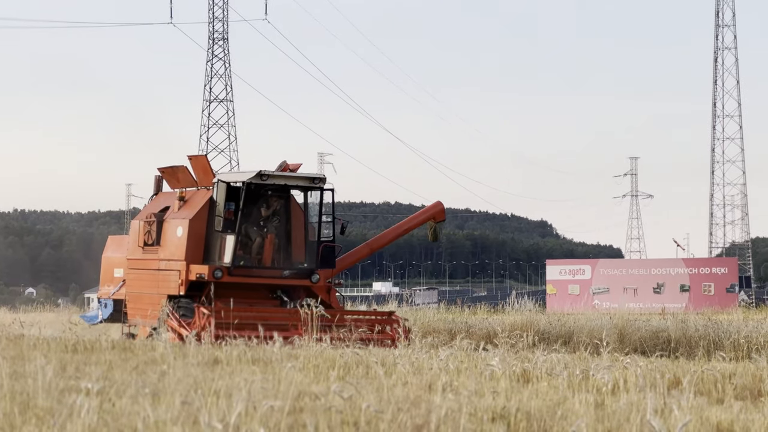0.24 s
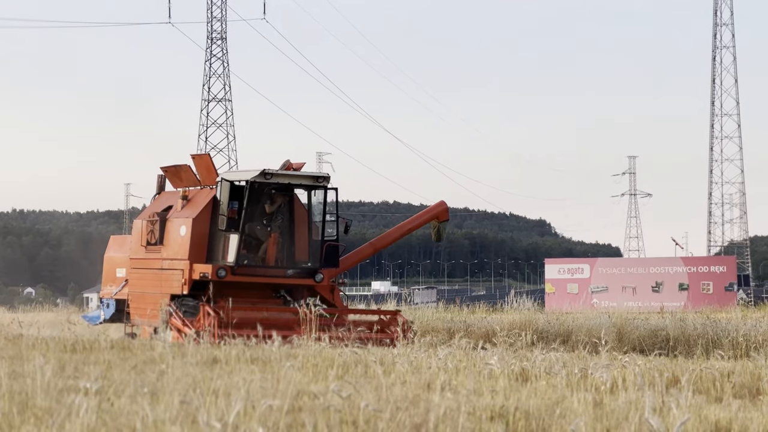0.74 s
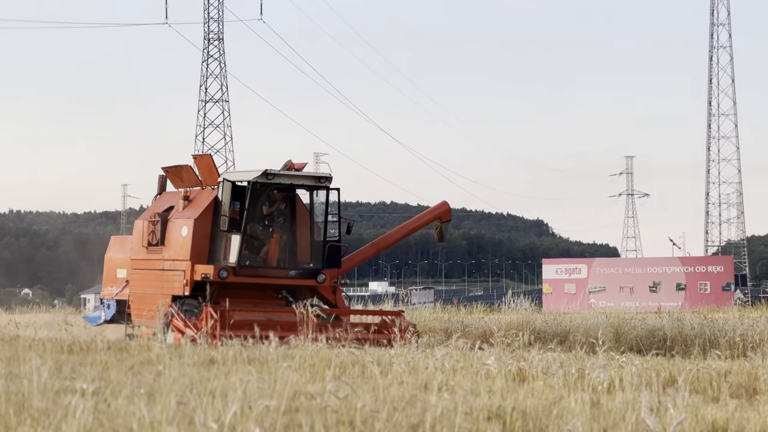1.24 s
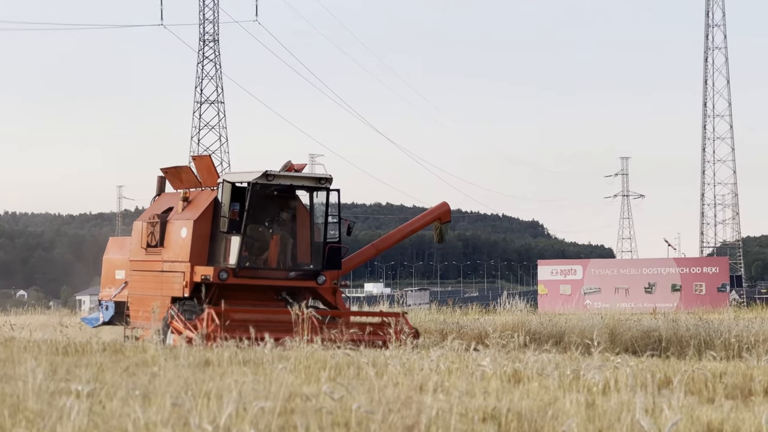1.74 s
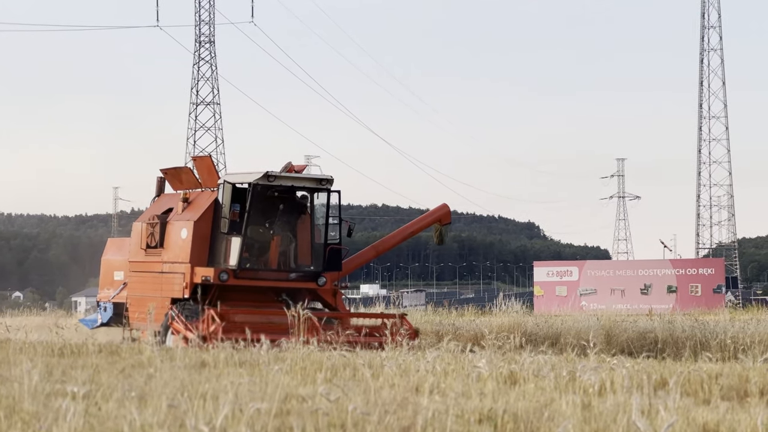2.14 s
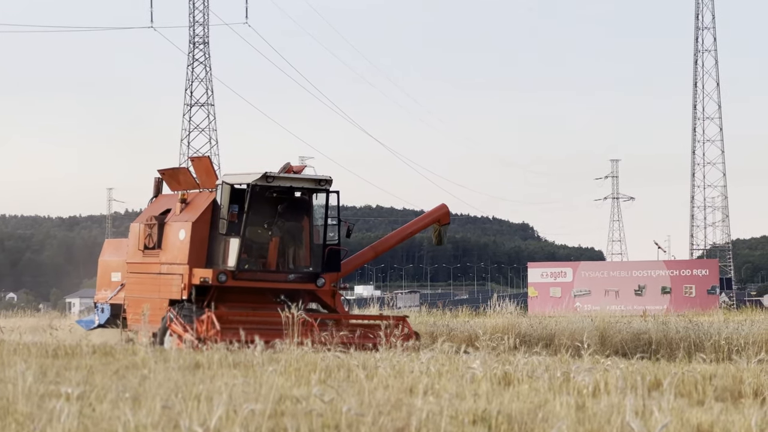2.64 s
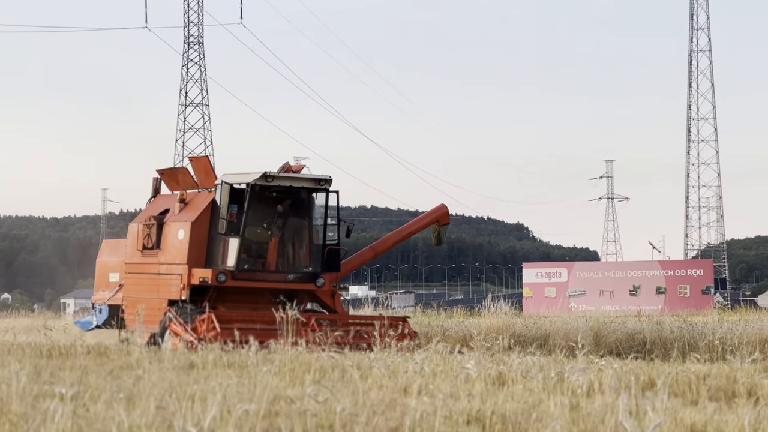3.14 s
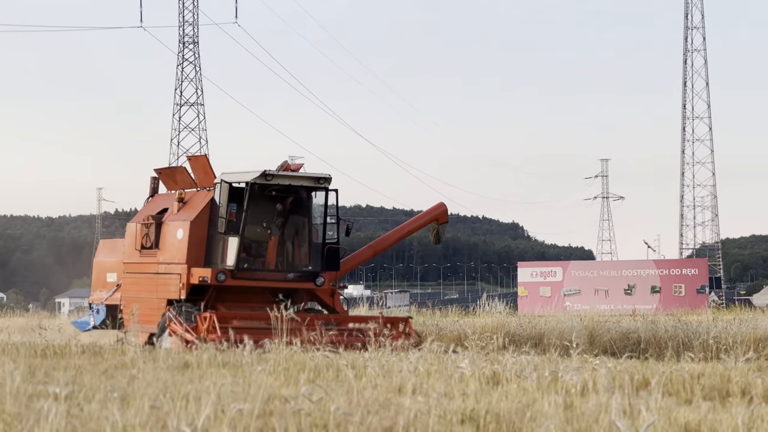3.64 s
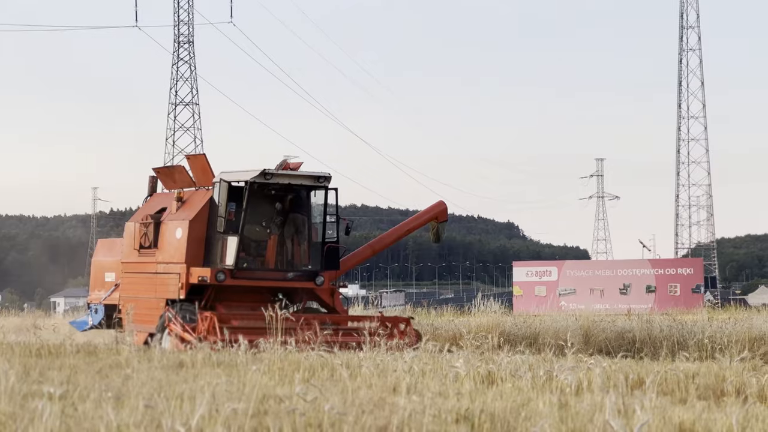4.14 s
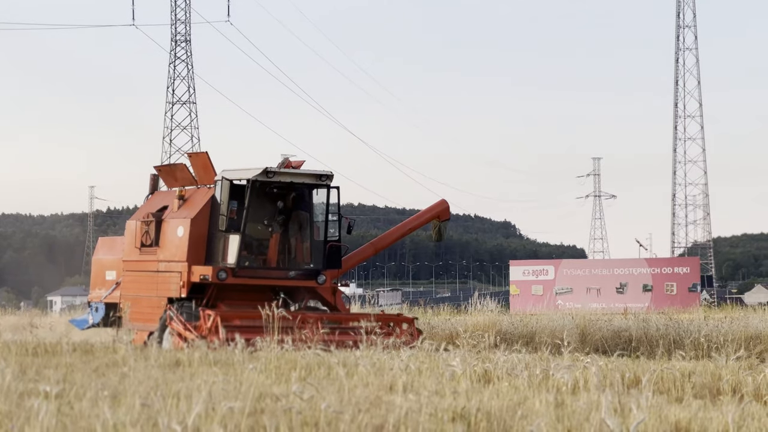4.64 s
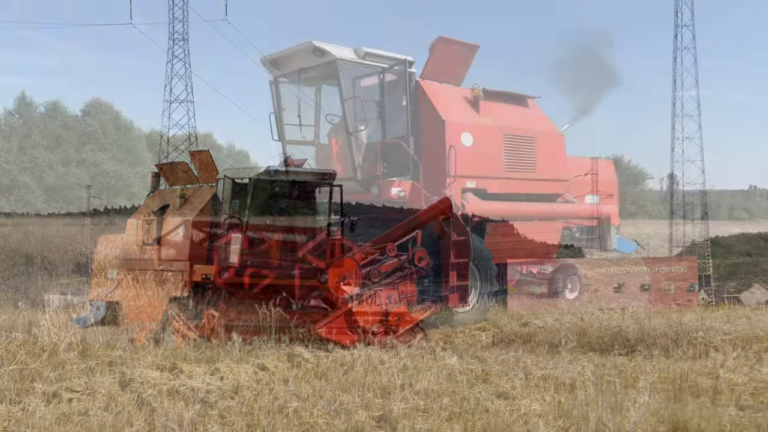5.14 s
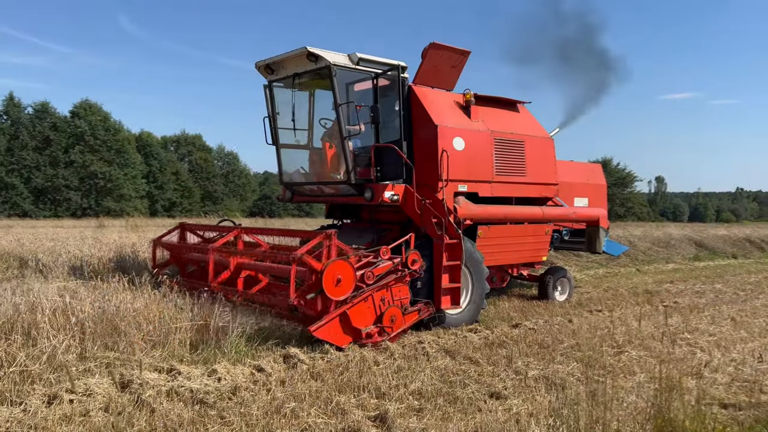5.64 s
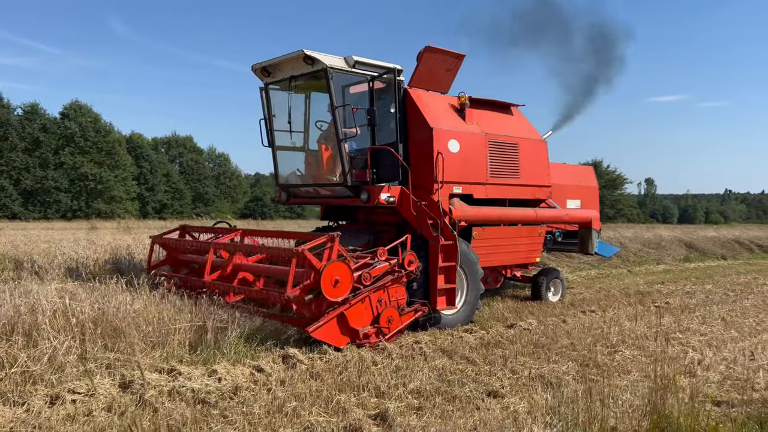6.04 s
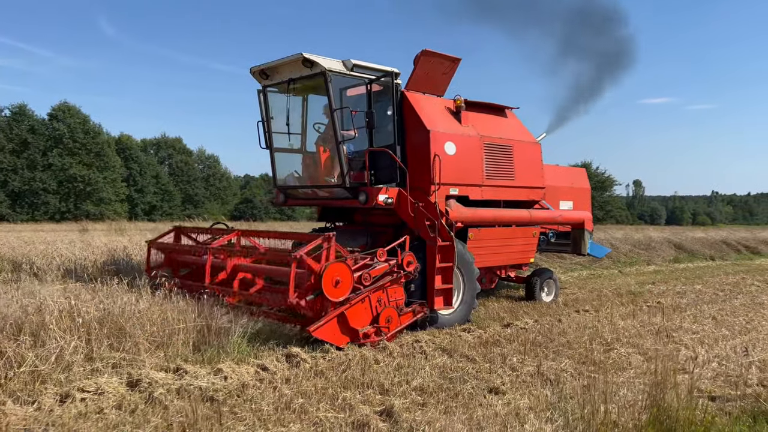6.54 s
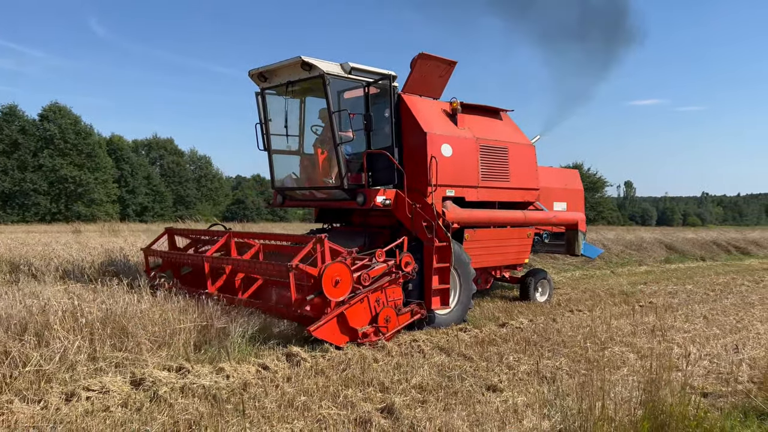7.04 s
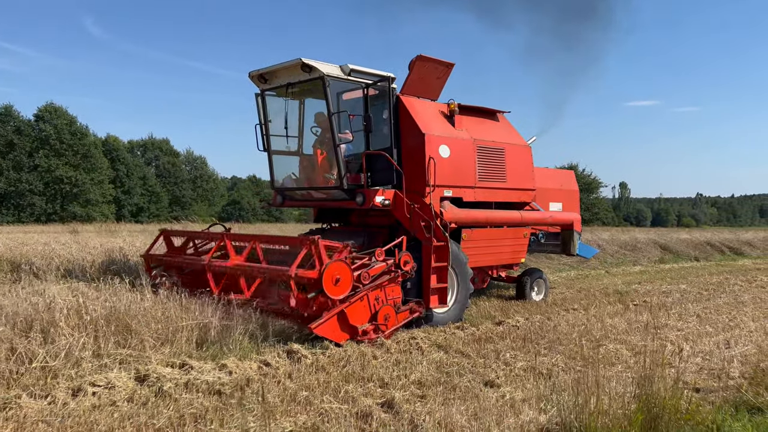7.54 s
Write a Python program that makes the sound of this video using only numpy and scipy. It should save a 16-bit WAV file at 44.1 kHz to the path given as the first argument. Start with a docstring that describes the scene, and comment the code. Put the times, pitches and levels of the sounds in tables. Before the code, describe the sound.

A heavy diesel harvesting machine heard from three distances in a dry open field. First a distant, dull, near-constant hum and rumble; then a smooth blend into a nearer, slightly harsher drone with dull knocks; then a sudden cut to a close microphone, where the motor starts low and strained, climbs in pitch and throbs, surrounded by dense metallic rattle, sharp knocks and crackling swishes of straw. It ends still running.

```python
"""The diesel of a combine harvester at work, heard from three places in turn: far off, blending into
a nearer place, then cut to close by while the engine picks up speed.
Firing orders are smeared harmonic tones; the drone of drum, fan and sheet metal and the hiss of straw
are coloured, partly coherent two-channel noise; jolts, knocks and chinks are decaying modes.
Passing wads of straw lift the noise in short swishes."""
import sys
import numpy as np
from scipy import signal
from scipy.io import wavfile
from scipy.ndimage import uniform_filter1d

SR = 44100
rng = np.random.default_rng(int(sys.argv[2]) if len(sys.argv) > 2 else 0)


def unload_wav(signal):
    """Save mono or channel-first audio to the path in sys.argv[1] as 16-bit WAV at rate SR, clipped to [-1, 1]."""
    wavfile.write(
        sys.argv[1],
        SR,
        np.round(np.clip(np.atleast_2d(signal).T, -1, 1) * 32767).astype(np.int16),
    )


N = 343980

BLEND_START_S, CUT_S, END_S = 4.78, 5.857, 7.8
FAR_HZ, FULL_HZ = 63.3, 66  # firing rate far off; full firing rate nearer and close by
SLOW_HZ, PICK_UP_S = 48.5, .56  # close by: firing rate at the cut, time constant of the pick-up
LABOUR_BEAT_DB = 21  # gain of the exhaust beat per halving-sized loss: 21 dB at half speed
STRAIN_TOP_S, STRAIN_RISE_S, STRAIN_EASE_S = 6.04, .22, .5  # top, and Gaussian 1/e widths beside it
GROWL_DB, GROWL_ORDER, GROWL_OCTAVES = 6, 5.6, .3  # orders near this one gain most at full strain
THROB_PER_S, THROB_TOP_S, THROB_DEPTH = 5.3, 7.02, 0.4  # beat throb close by; depth 0-1 at full speed
CRACKLE = .35  # flicker of a swish, in proportion to its lift
CHINK_T60_S, CHINK_RISE_S = .05, .004
KNOCK_T60_S, KNOCK_RISE_S = 0.02, 0.0016  # dull blows on the housing
FADE_BEND, SWELL_BEND = 0.57, 0.44  # fade exponents of far and nearer: 1 = straight, less = bowed

# Spectral change under full strain, before noise is scaled to its rms: f/Hz, gain/dB
LABOUR_GAIN = [(45, -6), (80, -1), (150, 1), (250, 4.5), (305, 0.5), (350, 3.5), (460, -0.5), (600, 2),
               (1000, 2), (2500, 4), (4000, 1.5)]


def gain_of(db):
    """Level to amplitude ratio: 20 dB are a factor of ten."""
    return 10 ** (np.asarray(db) / 20)


def evened(x):
    """Normalisation of the mean power: scales to rms 1."""
    return x / np.sqrt(np.mean(abs(x) ** 2) + 1e-20)


def read(points, hz, column=1):
    """Spectral interpolation: one table column, linear over log frequency."""
    table = np.array(points, float)
    return np.interp(np.log(hz + 1), np.log(table[:, 0] + 1), table[:, column])


def drift(n, span):
    """Narrow-band random process: complex noise smoothed twice over span samples, at rms 1."""
    noise = rng.standard_normal((2, n))
    a, b = uniform_filter1d(uniform_filter1d(noise, int(span)), int(span))
    return evened(a + 1j * b)


def engine(firing_hz, orders, ports, beat_db, overtones_db, strain):
    """Order synthesis: steady phasors mixed with wavering ones, as uneven firings smear each line."""
    turns, out = np.cumsum(firing_hz) / SR, 0
    for k, (multiple, db, rough, smear_hz) in enumerate(orders):
        rough = np.clip(rough, 0, 1)
        hz = multiple * firing_hz.mean()
        waver = np.sqrt(1 - rough ** 2) + rough * drift(len(turns), span=SR / (2 * smear_hz))
        if k == 0:  # the exhaust beat
            level_db = db + beat_db
        else:
            growl_db = GROWL_DB * np.exp(-(np.log2(multiple / GROWL_ORDER) / GROWL_OCTAVES) ** 2)
            level_db = db + overtones_db + (read(LABOUR_GAIN, hz) + growl_db) * strain
        phasor = np.exp(2j * np.pi * (multiple * turns + rng.random()))
        tone = np.sqrt(2) * gain_of(level_db) * (waver * phasor).real
        tilt = gain_of(read(ports, hz, column=2) / 2)
        out = out + np.array([tone * tilt, tone / tilt])
    return out


def swishes(t, hz):
    """Transient band excitation: each wad of straw lifts a wide band, quickly up and slower down."""
    # Wads: t/s, lift/dB (before the layer's share and the crackle), centre f/Hz
    wads = [(1.06, 1.5, 5000), (1.598, 6, 6000), (2.475, 6, 5000), (2.83, 3, 9000), (4.07, 2, 4000),
            (4.215, 3.5, 6000), (4.3, 2.5, 5000), (5.163, 4, 5000), (6.02, 0, 5000), (6.21, 1, 6100),
            (6.36, 6.5, 6060), (6.55, 1.5, 4000), (6.784, 2, 5900), (7.236, 9.5, 6300), (7.592, 4.5, 9000),
            (7.655, 5, 7100)]
    lift_db = 0
    for s, db, centre_hz in wads:
        in_time = ((t - s) / np.where(t < s, .018, .04)) ** 2  # 1/e widths in s
        in_pitch = (np.log2((hz + 1) / centre_hz) / 1.2) ** 2  # 1/e half-width 1.2 octaves
        lift_db = lift_db + db * np.exp(-in_time - in_pitch)
    return lift_db


def field(t, colour, ports, lead, patchy_db, flicker_db, swishing, strain, size):
    """Partly coherent noise field: coloured spectra with drifting patches, common flicker and swishes."""
    hop = size // 4
    frames, hz = len(t) // hop + 5, np.fft.rfftfreq(size, 1 / SR)[:, None]
    at = t[0] + np.arange(frames) * hop / SR
    a, b, c, d, patches = rng.standard_normal((frames, len(hz), 5)).T
    # patches span about 12 bins and 6 frames
    patches = evened(uniform_filter1d(uniform_filter1d(patches, size=12, axis=0), size=6, axis=1))
    same = np.clip(read(ports, hz), 0, 1)
    left = a + 1j * b
    right = same * left + np.sqrt(1 - same ** 2) * (c + 1j * d)
    right = right * np.exp(-1j * read(lead, hz))
    tilt = gain_of(read(ports, hz, column=2) / 2)
    spectra = np.array([left * tilt, right / tilt])
    crackle = 1 + CRACKLE * drift(frames, span=1).real
    moving_db = patchy_db * patches + flicker_db * drift(frames, span=2.9).real
    moving_db = moving_db + swishing * swishes(at, hz) * crackle
    labour_db = read(LABOUR_GAIN, hz) * np.interp(at, t, strain)
    spectra *= gain_of(read(colour, hz) + labour_db + moving_db)
    return evened(signal.istft(spectra, nperseg=size, noverlap=size - hop)[1][:, :len(t)])


def place(row, orders, drone, hiss, ports, lead, flicker_db, labours=False):
    """Superposition at one place: firing orders, drone and hiss; upper orders follow the drone level."""
    start_s, stop_s, top_hz, beat_db, drone_db, hiss_db = row
    start, stop = max(round(start_s * SR), 0), min(round(stop_s * SR), N)
    t = np.arange(start, stop) / SR
    firing_hz = top_hz - labours * (top_hz - SLOW_HZ) * np.exp(-(t - start_s) / PICK_UP_S)
    slowness = 2 * (1 - firing_hz / top_hz)  # 1 at half speed
    strain_width_s = np.where(t < STRAIN_TOP_S, STRAIN_RISE_S, STRAIN_EASE_S)
    strain = labours * np.exp(-((t - STRAIN_TOP_S) / strain_width_s) ** 2)
    depth = labours * np.clip(THROB_DEPTH * (1 - slowness), 0, .95)
    throb = 1 + depth * np.cos(2 * np.pi * THROB_PER_S * (t - THROB_TOP_S))
    beat_db = beat_db + LABOUR_BEAT_DB * slowness + 20 * np.log10(throb)
    rumble = field(t, drone, ports, lead, patchy_db=0.84, flicker_db=0.0, swishing=1.0,
                   strain=strain, size=2048)
    straw = field(t, hiss, ports, lead, patchy_db=1.12, flicker_db=flicker_db, swishing=.9,
                  strain=strain, size=512)
    out = np.zeros((2, N))
    out[:, start:stop] = engine(firing_hz, orders, ports, beat_db, drone_db, strain)
    out[:, start:stop] += gain_of(drone_db) * rumble + gain_of(hiss_db) * straw
    out[:, start:start + 60] *= np.linspace(0, 1, 60)  # soft onset, in samples
    return out


# In the three places below, the tables list:
#   row: start t/s, stop t/s, full firing f/Hz, exhaust beat/dB, drone/dB, straw hiss/dB
#   orders: multiple of the firing rate, level/dB (first: re beat; others: re drone),
#           roughness 0-1, smear/Hz
#   drone, hiss: f/Hz, relative spectral level/dB per Hz
#   ports (the two channels): f/Hz, likeness 0-1, left-right difference/dB
#   lead: f/Hz, phase by which left leads/rad
def close_place():
    """Run-up under load: rising firing rate, passing strain and a throbbing exhaust beat close by."""
    # Columns as listed above
    close_row = (CUT_S, END_S, FULL_HZ, -23, -16, -32.5)
    close_orders = [(1, -3.5, 0.16, 3.8), (4 / 3, -13.5, .6, 3), (1.81, -11, .5, 2.5), (4, -16, .6, 6),
                    (16 / 3, -23, .7, 5), (6, -19.5, .35, 4), (7.62, -23, .6, 4), (8, -17.5, .25, 3),
                    (12, -24, .65, 6)]
    close_drone = [(25, -42), (50, -0.5), (90, 0.5), (190, -5.5), (255, -3), (290, -8.5), (345, -4.5),
                   (400, -8.5), (600, -14), (780, -11.5), (1000, -15), (1330, -14.5), (1480, -14),
                   (1780, -22), (2000, -20), (2320, -28.5), (2450, -26), (2850, -29), (3100, -38),
                   (3350, -31), (6000, -48.5)]
    close_hiss = [(1500, -21), (3100, -4), (4200, -2), (6500, -1), (7500, -4.5), (9000, -6.5), (11500, -10),
                  (12500, -15), (15700, -20)]
    close_ports = [(100, 0.99, 0.5), (348, 0.99, 1), (1040, 0.87, -1), (1700, 0.62, -2), (3100, 0.58, 1),
                   (4680, 0.19, 1), (7300, .05, 9.5), (8000, .1, 0), (9500, .05, 0)]
    close_lead = [(300, -.1), (1000, -.3), (2000, 0), (3100, .9), (4500, 1.4)]
    return place(close_row, close_orders, close_drone, close_hiss, close_ports, close_lead,
                 flicker_db=1.5, labours=True)


def nearer_place():
    """Steady periodic source: constant firing rate amid drone and hiss at the nearer place."""
    # Columns as listed above
    nearer_row = (BLEND_START_S, CUT_S, FULL_HZ, -31, -20.5, -35.5)
    nearer_orders = [(1, 1, 0.85, 13), (1.88, -13, .7, 5), (3, -15, .6, 4), (4, -16, .5, 4),
                     (5, -18, .6, 4), (6, -23, .6, 4), (7.5, -21, .6, 4), (8, -13.5, .3, 3),
                     (12, -20, .5, 5), (15, -25, .4, 4)]
    nearer_drone = [(15, -60), (25, -32), (56, -3.5), (113, -2.5), (175, -8.5), (325, -7), (416, -16),
                    (533, -10.5), (669, -15), (790, -14), (1500, -19.5), (3500, -31.5), (4550, -46),
                    (7700, -120)]
    nearer_hiss = [(1200, -30), (2500, -31), (4000, -1.5), (6000, -5), (8600, -4.5), (10000, -5),
                   (12000, -9.5), (15700, -14)]
    nearer_ports = [(100, .99, .5), (350, .95, 1), (1000, .76, 1), (2000, .3, 2.5), (4000, .45, .5),
                    (5500, .2, 4), (7200, .1, 1), (8600, .9, 0), (9200, .6, 0), (10100, .99, 0),
                    (11200, .6, 0), (12100, .99, 0), (12900, .6, 0), (13900, .99, 0), (14800, .6, 0),
                    (15500, .99, 0)]
    nearer_lead = [(1000, 0), (1700, .7), (8000, .7), (8600, 0), (9750, -3.14), (10400, -3.14),
                   (11800, -6.28), (12400, -6.28), (13500, -9.42), (14400, -9.42), (15200, -12.57)]
    return place(nearer_row, nearer_orders, nearer_drone, nearer_hiss, nearer_ports, nearer_lead,
                 flicker_db=1.0)


def far_place():
    """Superposed rotating sources: firing orders, separate hums and uneven low jolts far off."""
    # Columns as listed above
    far_row = (0, CUT_S, FAR_HZ, -36.5, -24.5, -41.5)
    far_orders = [(1, 0, .6, 2), (2 / 3, -20, .4, 2), (5 / 3, -12, .6, 2), (2, -14, .6, 2), (3, -18, .6, 2),
                  (11 / 3, -21, .6, 2), (4, -16, .4, 2), (8, -31, .6, 2), (12, -23, .65, 3.5),
                  (37 / 3, -26, .6, 3), (38 / 3, -25, .55, 3), (13, -28, .6, 3), (14, -32, .6, 3),
                  (16, -32, .6, 3)]
    far_drone = [(25, -30), (42, -26), (60, -2.5), (130, 1), (170, -3.5), (250, -5), (300, -10),
                 (345, -13.5), (385, -19.5), (470, -15), (545, -18.5), (620, -14), (720, -12), (800, -11),
                 (870, -17.5), (1100, -16), (1320, -21), (1500, -19), (1950, -26.5), (3500, -30),
                 (6000, -96)]
    far_hiss = [(1200, -42), (2500, -5), (3600, -3), (4200, -5), (7000, -4.5), (8200, -6), (9500, -8),
                (11500, -11), (12600, -17), (14000, -15), (15600, -17.5)]
    far_ports = [(140, .995, 2.3), (350, .995, 1), (800, .98, 3), (1500, .995, 0), (2500, .998, 0),
                 (3500, .9, 0), (5300, .998, 0), (6600, .998, 0), (7200, .7, 0), (7900, .995, 0),
                 (8800, .995, 0), (9400, .7, 0), (11100, .998, 0), (13000, .998, 0), (13500, .65, 0),
                 (15700, .5, 0)]
    far_lead = [(2580, 0), (3300, .5), (5250, 0), (6700, 0), (7800, 3.14), (8850, 3.14), (9300, 1.5),
                (11100, 0), (13000, 0), (15700, -2)]
    # Hums of drum, fan and belts: f/Hz, level/dB, roughness 0-1, smear/Hz
    far_hums = [(57.8, -40, .6, 2), (60.6, -35, .6, 2), (71.7, -33.5, .55, 2), (117.1, -33.5, .55, 2.5),
                (135, -42, .7, 3), (152.5, -37, .9, 5), (477.3, -38.7, .13, 4), (350.5, -50, .6, 2),
                (659, -44.5, .9, 9), (703, -46, .8, 5), (722, -46.5, .85, 6), (842, -51, .7, 4)]
    hums = engine(np.ones(N), far_hums, far_ports, 0, 0, 0)  # orders of 1 Hz
    machine = place(far_row, far_orders, far_drone, far_hiss, far_ports, far_lead, flicker_db=0.3)
    jolts = blows(0, CUT_S, per_s=33, db=-23.5, low_hz=58.5, octaves=2.27,
                  t60_s=0.067, rise_s=0.0033, wide=.1)
    return hums + machine + jolts


def chinks(rows, t60_s=CHINK_T60_S, rise_s=CHINK_RISE_S, wide=1):
    """Damped modes: soft-started decaying sines, each panned and phase-shifted at random."""
    out, t = np.zeros((2, N)), np.arange(SR // 10) / SR
    for (s, db, hz), (side, turn) in zip(rows, rng.random((len(rows), 2))):
        envelope = gain_of(db - 60 * t / t60_s) * (1 - np.exp(-t / rise_s))
        shift = np.array([[0], [wide * turn / 4]])  # in cycles, right channel only
        ring = envelope * np.sin(2 * np.pi * (hz * t + shift))
        side = .5 + wide * (side - .5)
        part = out[:, round(s * SR):][:, :len(t)]
        part += (2 * ring * np.sqrt([[side], [1 - side]]))[:, :part.shape[1]]
    return out


def blows(start_s, stop_s, per_s, db, low_hz, octaves, t60_s, rise_s, wide):
    """Random impacts: dull damped modes at uniform random times, most faint and a few strong."""
    s, size, pitch = rng.random((int(per_s * (stop_s - start_s)), 3)).T
    times = start_s + s * (stop_s - start_s)
    levels_db = db - 12 * np.sqrt(size) - 5.0 * pitch
    rows = np.transpose([times, levels_db, low_hz * 2 ** (octaves * pitch)])
    return chinks(rows, t60_s, rise_s, wide)


def clatter(blend):
    """Impact excitation of the housing: random blows and the clearest knocks of the threshing parts."""
    # Knocks: t/s, level/dB (before soft start and panning), f/Hz
    clear_knocks = [(5.065, -17, 721), (5.22, -17, 770), (5.425, -16, 603), (5.815, -13, 638),
                    (5.952, -6, 1030), (6.528, -11, 654), (6.735, -11, 820), (6.839, -11, 840),
                    (7.143, -11, 929), (7.249, -9.5, 1070), (7.545, -10, 1000)]
    nearer = blows(BLEND_START_S, CUT_S, per_s=70, db=-18, low_hz=550, octaves=2.3,
                   t60_s=KNOCK_T60_S, rise_s=KNOCK_RISE_S, wide=.4)
    close = blows(CUT_S, END_S, per_s=70, db=-17, low_hz=548, octaves=1.9,
                  t60_s=KNOCK_T60_S, rise_s=KNOCK_RISE_S, wide=.4)
    return blend * nearer + close + chinks(clear_knocks, KNOCK_T60_S, KNOCK_RISE_S, wide=.3)


def rattle(start_s, stop_s, per_s, db):
    """Random modal excitation: many fainter chinks at random moments and pitches."""
    s, size, pitch = rng.random((int(per_s * (stop_s - start_s)), 3)).T
    times = start_s + s * (stop_s - start_s)
    levels_db = db - 8 * size - 10 * pitch
    return chinks(np.transpose([times, levels_db, 900 * 2 ** (3.3 * pitch)]))


def loose_metal():
    """Modal ringing: loose metal parts chink close by above a dense rattle."""
    # Chinks: t/s, level/dB (before soft start and panning), f/Hz
    clear_chinks = [(5.94, -25, 5480), (6.19, -35, 7500), (6.19, -25, 1980), (6.36, -30, 7360),
                    (6.43, -33.5, 8400), (6.455, -27, 5400), (6.545, -22, 2500), (6.86, -30, 7100),
                    (7.58, -40, 7000), (7.765, -29, 8500)]
    return chinks(clear_chinks) + rattle(CUT_S, END_S, per_s=220, db=-25)


def scene():
    """Weighted superposition: far fades under nearer, which cuts to close by."""
    blend = np.clip((np.arange(N) / SR - BLEND_START_S) / (CUT_S - BLEND_START_S), 0, 1)
    far = (1 - blend) ** FADE_BEND * far_place()
    nearer = blend ** SWELL_BEND * nearer_place()
    return close_place() + nearer + far + clatter(blend) + loose_metal()


def record(dry):
    """Transducer response: the microphone loses deep bass and rounds high peaks; then a band limit."""
    thinned = signal.sosfilt(signal.butter(2, 38, "high", fs=SR, output="sos"), dry)
    rounded = 1.3 * np.tanh(thinned / 1.3)
    band_limit = signal.firwin(1535, 15760, window=("kaiser", 9), fs=SR)  # low-pass, edge in Hz
    return signal.oaconvolve(rounded, band_limit[None], "same")


dry = scene()
out = record(dry)
unload_wav(out)
```